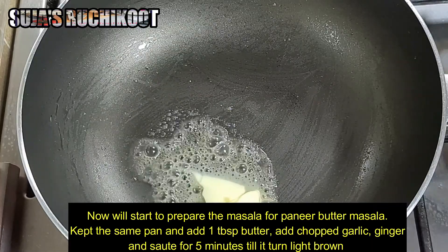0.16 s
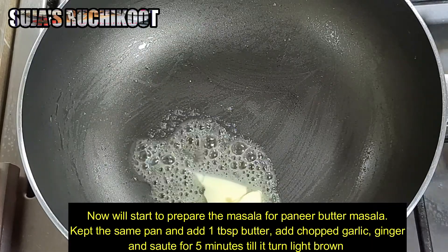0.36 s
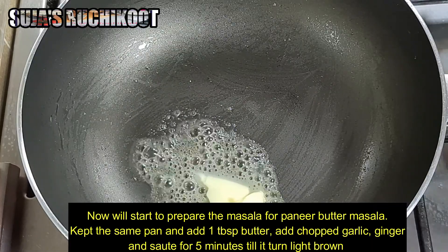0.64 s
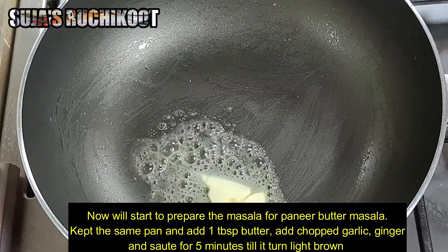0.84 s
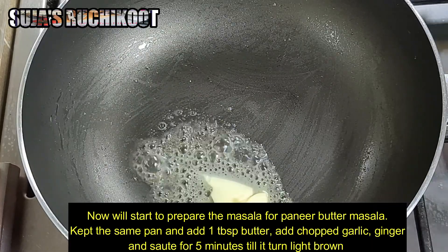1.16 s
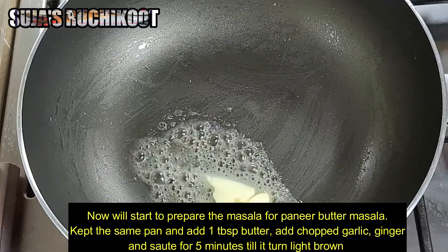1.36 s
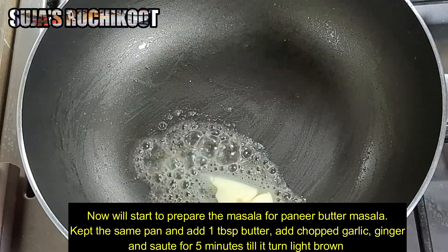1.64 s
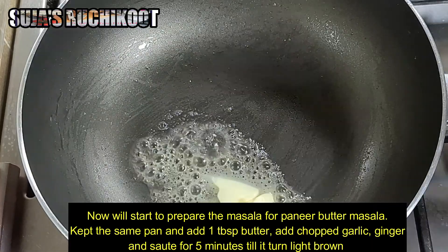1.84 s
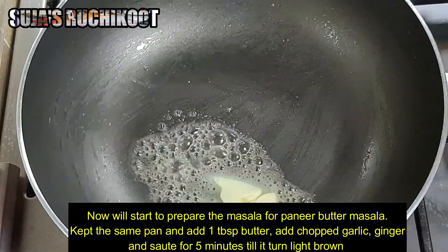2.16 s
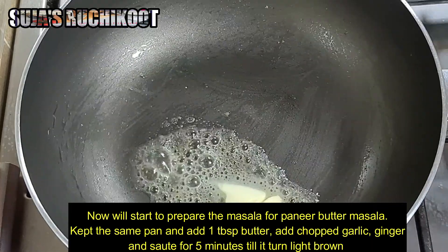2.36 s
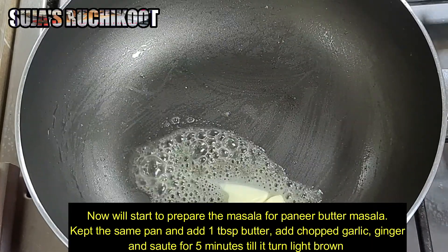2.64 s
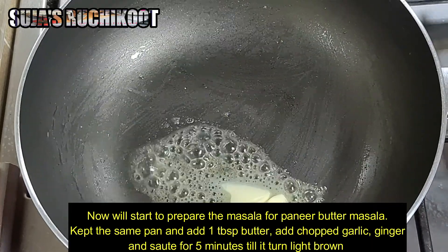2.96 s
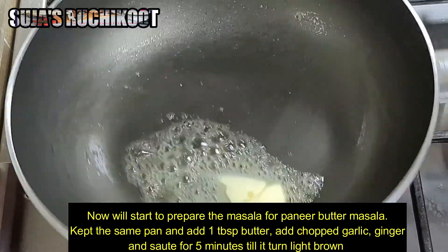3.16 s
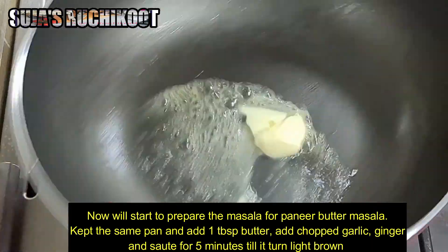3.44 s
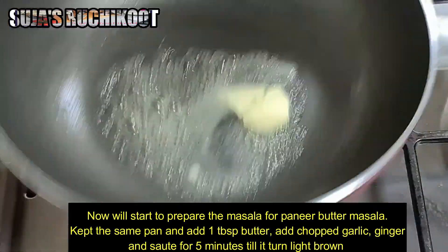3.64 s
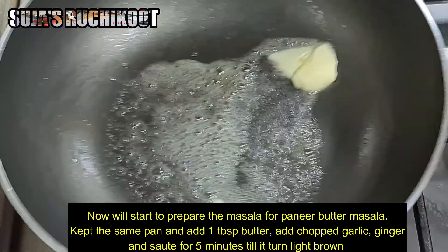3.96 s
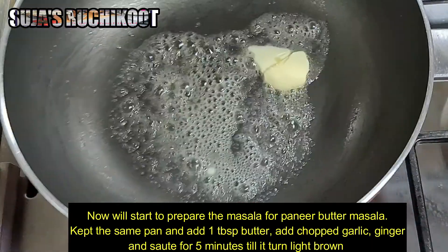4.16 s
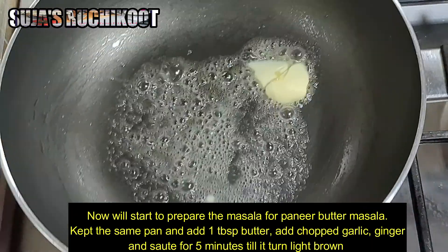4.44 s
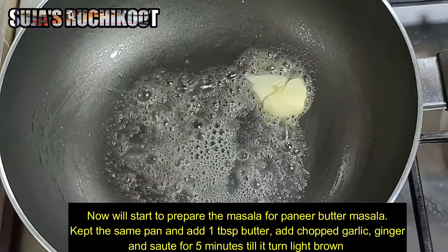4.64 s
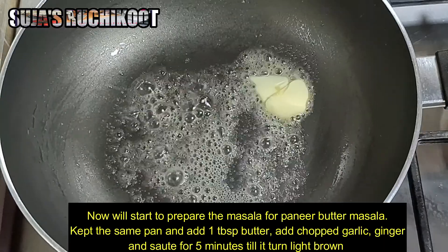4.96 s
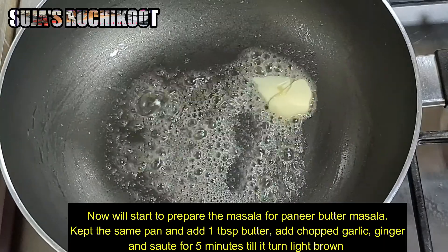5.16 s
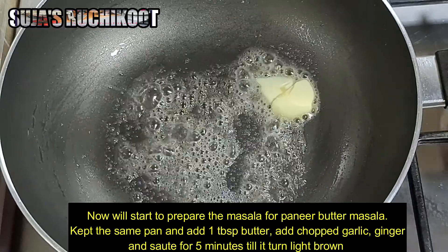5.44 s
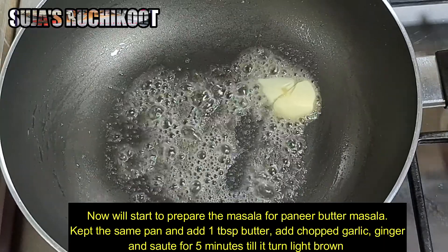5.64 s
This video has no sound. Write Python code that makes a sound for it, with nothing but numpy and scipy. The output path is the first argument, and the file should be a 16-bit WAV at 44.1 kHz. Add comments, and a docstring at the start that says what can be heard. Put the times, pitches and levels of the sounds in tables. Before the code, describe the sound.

Close stereo kitchen sizzle over a low burner hum, broken by hard metallic knocks midway and fizzing more loudly after the pan is swirled.

```python
"""Butter sizzles in a deep steel pan on a gas stove in a small kitchen, close by in stereo.
From the start: foam of bursting steam bubbles, the hum of flame and room, single large pops; from 1.2 s a
whistle swells now and then. From 2.2 s utensil and pan knock and counter and stove top boom along; a small
metal part clinks. From 3.5 s the foam grows, spreading in the swirled pan, which bumps again from 4.7 to 5 s.
Grains and blows ring decaying sines; hum, spray and clatter are shaped noise."""
import sys
import numpy as np
from scipy import signal
from scipy.fft import rfft, irfft
from scipy.io import wavfile

SR = 44100
rng = np.random.default_rng(int(sys.argv[2]) if len(sys.argv) > 2 else 0)


def gain_from_db(level_db):
    """Turn a decibel level (scalar or array-like) into a linear amplitude factor."""
    decades = np.asarray(level_db, float) / 20
    return 10 ** decades


def master_out(mix):
    """Clip the mix to full scale and print it as 16-bit PCM to the path in sys.argv[1]."""
    frames = np.transpose(np.atleast_2d(mix))
    ceiling = np.clip(frames, -1, 1)
    pcm = np.round(ceiling * 32767).astype(np.int16)
    wavfile.write(sys.argv[1], SR, pcm)


N = 256044


def rms_one(x):
    """Scale to unit rms."""
    return x / np.sqrt(np.mean(x ** 2) + 1e-20)


def in_time(rows):
    """Table columns as curves, one value a sample."""
    s, *columns = np.transpose(rows)
    return [np.interp(np.arange(N) / SR, s, c) for c in columns]


def at_hz(points, hz, order=1):
    """Read a column of a frequency table on a log axis."""
    table = np.array(points)
    return np.interp(np.log(np.maximum(hz, 1)), np.log(table[:, 0]), table[:, order])


def drift(rate_hz):
    """Slow random curve of unit rms: noise through two equal poles, run at SR / 40."""
    r = np.exp(-2 * np.pi * rate_hz * 40 / SR)
    slow = signal.lfilter([1], [1, -2 * r, r * r], rng.standard_normal(N // 40 + 2002))
    slow = rms_one(slow[2000:])   # skip the run-in
    return np.interp(np.arange(N) / 40, np.arange(len(slow)), slow)


def ring(clicks, hz, t60_s):
    """Two-pole resonator: a unit click sets a decaying sine of height 1 ringing."""
    r = 10 ** (-3 / (t60_s * SR))
    w = 2 * np.pi * hz / SR
    return signal.lfilter([0, np.sin(w)], [1, -2 * r * np.cos(w), r * r], clicks + 1e-18)


def band_pass(x, low_hz, high_hz, order=2):
    """Butterworth band-pass."""
    return signal.sosfilt(signal.butter(order, [low_hz, high_hz], "band", fs=SR, output="sos"), x)


def sides(left_right_db):
    """Left and right gains for a level difference."""
    return gain_from_db(np.array([left_right_db, -left_right_db]) / 2)


def bowl(x, t60_s, level_db):
    """The steel bowl scatters each burst into a short dense tail, another one at each ear."""
    t = np.arange(4096) / SR
    envelope = 10 ** (-3 * t / t60_s) * np.minimum(t / 0.001, 1)
    tail = rng.standard_normal((2, 4096)) * envelope
    tail = gain_from_db(level_db) * tail / np.sqrt(np.sum(tail ** 2, axis=1, keepdims=True))
    return x + signal.fftconvolve(x, tail, axes=1)[:, :N]


# foam, spreading once the pan is swirled: (time [s], fine bubble level [dB], coarse bubble level [dB])
FOAM_LEVELS = [(0.0, -47.5, -55.5), (0.6, -49.5, -55.5), (1.4, -51, -54.5), (2.15, -49, -52),
               (2.8, -51, -56.5), (3.28, -50, -55), (3.45, -54, -60.5), (3.6, -45.5, -57), (3.8, -42, -49),
               (4.02, -42, -52.5), (4.28, -39.5, -47), (4.65, -38.5, -47.5), (5.0, -39, -48),
               (5.4, -39.5, -48), (5.8, -40, -48)]
# colour of the foam: (frequency [Hz], relative density [dB per Hz])
FOAM_SPECTRUM = [(710, -16.5), (1200, -12.5), (1370, -11), (1650, -14.5), (1900, -11), (2100, -12),
                 (2760, -12), (3520, -9), (3800, -8), (5820, -4), (7010, -9), (9750, -6.5), (15300, -14.5),
                 (16000, -17), (16500, -82)]
FOAM_LEFT_RIGHT_DB = 0.5


def fizz(per_s=5000, spread_db=7.0, cycles=8.3, clump_db=4.0, together=0.33, mist_db=-0.5, split_hz=7800):
    """Small bubbles burst in clumps, each pitch with its own arrival lag, over a mist of tiny ones."""
    fine_db, coarse_db = in_time(FOAM_LEVELS)
    out = np.zeros((2, N))
    swell = drift(9.9)   # shared by all pitches
    for hz in np.geomspace(2000, 15500, 16):
        rate_per_s = per_s / 16 * gain_from_db(clump_db * (together * swell + drift(20)))
        born = rng.random(N) < rate_per_s / SR
        sizes = gain_from_db(spread_db * np.minimum(rng.exponential(1, N), 4.0)) * rng.choice([-1, 1], N)
        grains = rms_one(ring(sizes * born, hz, cycles / hz)) * np.sqrt(hz)
        lag = rng.integers(-12, 13)   # place in the pan sets the arrival difference [samples]
        out += np.array([grains, np.roll(grains, lag)])
    bursts = rms_one(bowl(out, t60_s=0.039, level_db=0.5))
    white = bursts + gain_from_db(mist_db) * rng.standard_normal((2, N))

    hz = np.fft.rfftfreq(N, 1 / SR)
    coloured = rfft(white) * gain_from_db(at_hz(FOAM_SPECTRUM, hz))
    low = 1 / (1 + (hz / split_hz) ** 6)
    coarse = rms_one(irfft(coloured * low, N))
    fine = rms_one(irfft(coloured * (1 - low), N))
    return sides(FOAM_LEFT_RIGHT_DB)[:, None] * (gain_from_db(coarse_db) * coarse + gain_from_db(fine_db) * fine)


# colour of flame and room: (frequency [Hz], relative density [dB per Hz])
ROOM_SPECTRUM = [(15, -46), (25, -4.5), (97, 3), (146, -13), (192, -7.5), (439, -25.5), (532, -17.5),
                 (732, -13.5), (1010, -30), (1190, -28), (1900, -22), (2300, -25), (4000, -15), (5200, -16),
                 (8800, -120)]
# narrow resonances: (frequency [Hz], width [Hz], added gain [dB])
ROOM_RESONANCES = [(48.5, 5.7, 7.5), (99.7, 4.65, 12.5), (157, 12.6, 4.5), (185.8, 3.3, 3), (193.4, 5.3, 7),
                   (357, 6.7, 3.5), (545, 7.5, 10.5), (571, 14, -1), (1183, 35, 11), (1917, 23, 13)]
# left-right likeness, below zero played as zero: (frequency [Hz], correlation [1])
EAR_LIKENESS = [(60, 1), (130, 1), (290, 0.64), (640, 0.64), (1410, -0.4), (3100, 0.31), (6820, -0.24),
                (15000, 0.38)]
WHISTLE_HZ, WHISTLE_WIDTH_HZ = 733.3, 29
RUMBLE_DB, WHISTLE_DB = -50.5, -67.5
RIGHT_LAG_S = 6e-5   # flame and room reach the right microphone later


def hum(waver_db=-1.0):
    """Flame and room noise swell in a few narrow resonances; the air in the bowl whistles faintly."""
    hz = np.fft.rfftfreq(N, 1 / SR)
    alike = np.clip(at_hz(EAR_LIKENESS, hz), 0, 1)
    mix = np.sqrt(np.array([1 + alike, 1 - alike]) / 2)   # mid and side gains
    peaks = sum(gain_from_db(db) / (1 + (2 * (hz - f) / w) ** 2) for f, w, db in ROOM_RESONANCES)
    rumble = gain_from_db(at_hz(ROOM_SPECTRUM, hz)) * (1 + peaks)
    whistle = 1 / (1 + (2 * (hz - WHISTLE_HZ) / WHISTLE_WIDTH_HZ) ** 2)
    lag = round(RIGHT_LAG_S * SR)
    out = 0
    for colour, db in ((rumble, RUMBLE_DB + waver_db * drift(2.2)), (whistle, WHISTLE_DB)):
        mid, side = irfft(rfft(rng.standard_normal((2, N))) * mix * colour, N)
        out = out + gain_from_db(db) * rms_one(np.array([mid + side, np.roll(mid - side, lag)]))
    return out


# large bubbles bursting: (time [s], level [dB], centre frequency [Hz], left-right difference [dB])
LARGE_BUBBLES = [(0.0148, -34, 11400, 2.0), (0.0572, -29, 9720, 4), (0.1992, -34.5, 5200, 3),
                 (0.351, -27.5, 12500, 1.0), (0.457, -32, 9630, 2.5), (0.573, -29.5, 7550, -2),
                 (0.6743, -32, 10100, 1.0), (0.8476, -26, 11600, 0.5), (0.9398, -31, 5400, -3),
                 (1.1076, -35, 9030, 5), (1.238, -34, 7460, -4), (1.347, -28, 5700, 1.5),
                 (1.4515, -31, 13400, 1.0), (1.662, -25.5, 8000, -3), (1.7458, -31, 10300, 1.0),
                 (1.9878, -30, 10700, 0.5), (2.022, -35, 9310, 0.0), (2.457, -33, 5140, 1.0),
                 (2.664, -23, 10600, 2.5), (2.739, -28.5, 5030, 0.5), (2.82, -22.5, 9300, 3.5),
                 (2.8852, -28.5, 5800, -1.0), (3.1237, -31, 9190, -3), (3.253, -27, 9500, 0.5),
                 (3.3525, -22.5, 11500, 1.5), (3.4436, -32, 9400, -1.0), (3.643, -22.5, 10900, 2.0),
                 (3.6759, -26, 9300, 2.5), (3.7897, -34, 4670, -3), (3.875, -28, 9410, 2.0),
                 (3.9598, -32, 9600, 1.0), (4.0381, -28, 9700, 4), (4.0656, -22.5, 11100, 1.5),
                 (4.1046, -20, 10700, 6), (4.235, -27, 9000, 6), (4.4794, -23, 9600, 0.5),
                 (4.585, -22, 9300, -1), (5.1797, -25, 5660, 2.0), (5.234, -20, 10600, 7),
                 (5.2888, -35, 10200, 2.5), (5.586, -28, 8520, -2), (5.618, -31, 11700, 2.5)]
# a large bubble sets off small ones of like pitch: level under its ring, 1/e time, bandwidth
SPRAY_DB, SPRAY_S, SPRAY_OCTAVES = -21.0, 0.018, 0.7


def pops(cycles=18.0, snap_db=-9.0, lag_s=0.00003):
    """A large bubble gives a broad snap, a brief ring at its own pitch and a dying spray of small ones."""
    out = np.zeros((2, N + 4096))
    click = np.zeros(4096)
    click[0] = 1
    snap = band_pass(click, 3500, 15000)
    dying = gain_from_db(SPRAY_DB) * np.exp(-np.arange(4096) / (SPRAY_S * SR))
    leans = rng.uniform(-1.2, 1, len(LARGE_BUBBLES))
    for (s, db, hz, left_right_db), lean in zip(LARGE_BUBBLES, leans):
        burst = ring(click, hz, cycles / hz) + gain_from_db(snap_db) * snap / snap.max()
        grains = rng.standard_normal((2, 4096)) * (rng.random(4096) < 0.15)
        edges_hz = np.minimum(hz * 2 ** (SPRAY_OCTAVES * np.array([-0.5, 0.5])), 0.45 * SR)
        spray = dying * rms_one(band_pass(grains, *edges_hz, order=1))
        for ear, gain in enumerate(sides(left_right_db)):
            at = round((s + ear * lean * lag_s) * SR)
            out[ear, at:at + 4096] += gain * gain_from_db(db) * (burst + spray[ear])
    return bowl(out[:, :N], t60_s=0.045, level_db=1.5)


# clear swells of the whistle: (time [s], rms level at the top [dB], half length to 1/e [s])
WHISTLE_SWELLS = [(1.187, -67, 0.046), (1.605, -64.5, .08), (2.476, -46, 0.028), (3.138, -47, 0.028),
                  (3.337, -56.5, 0.036), (3.942, -52, 0.041), (4.196, -58, 0.072), (4.343, -52, 0.043),
                  (5.7, -59.5, 0.027)]


def swells(tone_hz=738, wander_hz=2.63):
    """Brief clear swells of the whistle: a wandering sine under Gaussian envelopes."""
    t = np.arange(N) / SR
    level = sum(gain_from_db(db) * np.exp(-((t - s) / half) ** 2) for s, db, half in WHISTLE_SWELLS)
    phase = 2 * np.pi * np.cumsum(tone_hz + wander_hz * drift(3.2)) / SR
    return np.sqrt(2) * level * np.sin(phase)


# blows of the utensil:
# (time [s], utensil level [dB], counter level [dB], stove top level [dB], hardness [dB per octave])
UTENSIL_BLOWS = [(2.240, -17, -25.5, -27, -4), (2.269, -22, -24, -26, -13.5), (2.2848, -11, -21, -21, -0.5),
                 (2.562, -39.5, -50, -36.5, 0), (2.679, -45.5, -52, -46, 0), (2.80, -42, -49, -51, -12),
                 (3.042, -34, -42, -40, -3.5)]
# bumps of the pan:
# (time [s], pan level [dB], counter level [dB], stove top level [dB], hardness [dB per octave])
PAN_BUMPS = [(2.187, -34.5, -34, -30.5, -32), (2.21, -41, -48, -33, -5), (2.305, -27.5, -16.5, -28.5, -2.5),
             (3.125, -55, -45, -40, -8), (3.181, -65, -57, -44.5, -4), (3.246, -66, -45, -52, 1),
             (4.699, -15.5, -30, -19.5, -1), (4.929, -26.5, -38, -29, -7), (4.969, -36, -41, -38.5, -0.5),
             (5.046, -37, -40, -36, -12.5)]


def blows():
    """All blows as columns, the utensil's first."""
    return np.transpose(UTENSIL_BLOWS + PAN_BUMPS)


def clicks_at_blows(heights):
    """One click of the given height at each blow."""
    clicks = np.zeros(N)
    clicks[np.round(blows()[0] * SR).astype(int)] = heights
    return clicks


def hardness_db(hard, hz):
    """Soft blows leave the modes above 750 Hz weak."""
    return hard * np.log2(max(hz, 750) / 750)


def struck(modes, blow_db, rise_cycles=1.0, luck_db=2.5, apart_s=0.00012, apart_cycles=0.2):
    """Every blow rings every mode of a body; each mode swells for about a cycle."""
    s, *_, hard = blows()
    out = np.zeros((2, N))
    for hz, db, t60_s in modes:
        luck = luck_db * rng.normal(0, 1, len(s))
        clicks = clicks_at_blows(gain_from_db(blow_db + db + hardness_db(hard, hz) + luck))
        tone = ring(clicks, hz, t60_s) - ring(clicks, hz, np.log(1000) * rise_cycles / hz)
        lag = round(rng.choice([-1, 1]) * min(apart_s, apart_cycles / hz) * SR)
        out += np.array([tone, np.roll(tone, lag)])
    return out


def cracks(blow_db, t60_s=0.031, low_hz=900, high_hz=9000):
    """The first milliseconds of a hard contact are a bright noise."""
    *_, hard = blows()
    clicks = clicks_at_blows(gain_from_db(blow_db + 2 * hard))
    envelope = signal.lfilter([1], [1, -10 ** (-3 / (t60_s * SR))], clicks + 1e-18)
    return band_pass(rng.standard_normal((2, N)) * envelope, low_hz, high_hz)


# loose sheet metal and walls after a blow: (frequency [Hz], level [dB per half octave], t60 [s])
CLATTER = [(59.7, -11.5, 0.54), (108.5, -20.5, 0.99), (203, -15, 0.48), (385, -18, 0.49), (814, -16, 0.58),
           (1500, -18, 0.47), (3000, -16.5, 0.38), (5990, -19.5, 0.45), (14000, -27, 0.23)]


def rattle(metal_db, boom_db, rise_cycles=2.8, boom_top_hz=350):
    """After each blow a dense clatter dies band by band, most alike at both ears in the bass."""
    *_, hard = blows()
    out = np.zeros((2, N))
    edges_hz = 55 * 2 ** np.arange(0, 8.3, 0.5)
    white = rng.standard_normal((2, 2, N))   # neighbouring bands take turns
    for k, (low, high) in enumerate(zip(edges_hz, edges_hz[1:])):
        hz = np.sqrt(low * high)
        bass = 1 / (1 + (hz / boom_top_hz) ** 4)
        boom_power, metal_power = gain_from_db(2 * boom_db), gain_from_db(2 * (metal_db + hardness_db(hard, hz)))
        clicks = clicks_at_blows(bass * boom_power + (1 - bass) * metal_power)
        fall = 10 ** (-6 / (at_hz(CLATTER, hz, order=2) * SR))
        rise = np.exp(-hz / (rise_cycles * SR))   # lows build up later
        power = signal.lfilter([1 - rise], np.convolve([1, -fall], [1, -rise]), clicks + 1e-18)
        mid, side = rms_one(band_pass(white[k % 2], low, high))
        alike = np.clip(at_hz(EAR_LIKENESS, hz), 0, 1)
        stereo = np.sqrt(1 + alike) * mid + np.sqrt(1 - alike) * side * [[1], [-1]]
        out += gain_from_db(at_hz(CLATTER, hz)) * np.sqrt(power / 2) * stereo
    return out


# modes of utensil, pan base, counter and stove top: (frequency [Hz], relative level [dB], t60 [s])
UTENSIL_MODES = [(1165, -16, 0.062), (1327, 8.5, 0.021), (1443, -8, 0.074), (1720, -3, 0.044),
                 (2260, 0, 0.021), (2650, -8.5, 0.042), (3014, -18, 0.35), (3050, 0, 0.049),
                 (3230, -22, 0.14), (3900, -20.5, 0.152), (4137, -2, 0.042), (4850, -13.5, 0.073),
                 (5140, -17, 0.054), (5400, -11.5, 0.11), (5530, -18, 0.31), (5700, -23, 0.38),
                 (5660, -1, 0.029), (7170, -14.5, 0.046), (8100, -34, .05), (8520, -31, 0.44),
                 (9400, -21, 0.082)]
PAN_MODES = [(550, -8.5, 0.16), (626, -12.5, 0.16), (743, -5, 0.19), (994, 5, 0.053), (1091, -5.5, 0.1),
             (1414, -10, 0.098), (1472, -1, .06), (1580, -22, 0.061), (1835, -38, 0.053), (2516, -3, 0.048),
             (2900, -15, 0.065), (3740, -12, 0.064), (4270, -10, 0.073), (5220, -2, 0.041),
             (5400, -10, 0.087), (6400, -36.5, 0.067)]
COUNTER_MODES = [(69.6, 2, 0.52), (180, -6.5, 0.29), (239.9, -8, 0.27), (359, -22.5, 0.39),
                 (473, -23, 0.68)]
STOVE_MODES = [(91.5, 6, 0.32), (185.2, -7, 0.2), (275.5, -1.5, .15), (298, -11.5, 0.13), (513, -13, 0.42)]
PAN_ANSWERS_DB = -24   # the pan rings along under the utensil


def knocks(crack_db=-1.0):
    """Utensil, pan, counter and stove top answer each blow together; the clinks share the bowl."""
    s, metal_db, counter_db, stove_db, _ = blows()
    by_utensil = np.arange(len(s)) < len(UTENSIL_BLOWS)
    utensil = struck(UTENSIL_MODES, np.where(by_utensil, metal_db, -np.inf))
    pan = struck(PAN_MODES, metal_db + PAN_ANSWERS_DB * by_utensil)
    metal = utensil + pan + cracks(metal_db + crack_db)
    hollow = struck(COUNTER_MODES, counter_db) + struck(STOVE_MODES, stove_db)
    clatter = rattle(metal_db, np.maximum(counter_db, stove_db))
    return bowl(metal + clink(), t60_s=0.14, level_db=-5.5) + hollow + clatter


# touches of a small metal part: (time [s], level [dB])
CLINK_TOUCHES = [(2.564, -28.5), (3.042, -42)]
# its modes: (frequency [Hz], relative level [dB], t60 [s])
CLINK_RINGS = [(1820, 6.5, 0.05), (4095, -7.5, 0.14)]


def clink():
    """A light touch of metal rings two short modes, 0.2 ms later at the right."""
    click = np.zeros((2, N))
    for s, db in CLINK_TOUCHES:
        click[0, round(s * SR)] = gain_from_db(db)
        click[1, round((s + 0.0002) * SR)] = gain_from_db(db)
    return sum(ring(gain_from_db(db) * click, hz, t60_s) for hz, db, t60_s in CLINK_RINGS)


def scene():
    """Foam, hum, pops, whistle swells and knocks together."""
    return fizz() + hum() + pops() + swells() + knocks()


def top_cut(x):
    """Nothing passes above the cut-off."""
    return signal.sosfilt(signal.butter(12, 16850, fs=SR, output="sos"), x)


def record(dry):
    """Steep bass cut of the microphone at 38 Hz."""
    mix = signal.sosfilt(signal.butter(4, 38, "high", fs=SR, output="sos"), dry)
    return top_cut(mix)


dry = scene()
out = record(dry)
master_out(out)
```